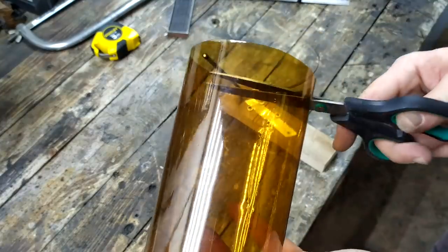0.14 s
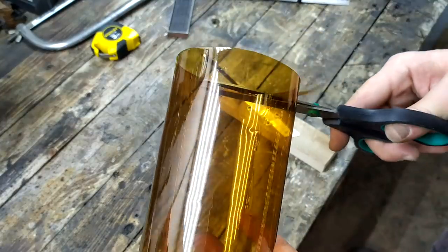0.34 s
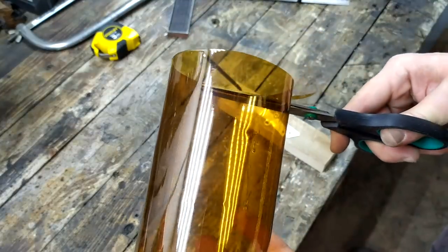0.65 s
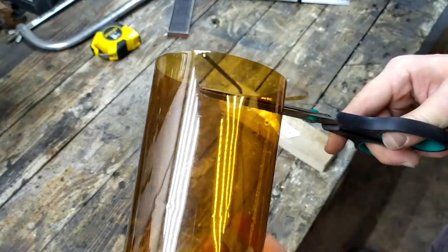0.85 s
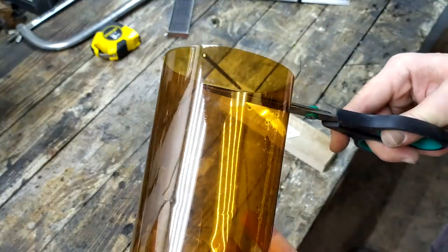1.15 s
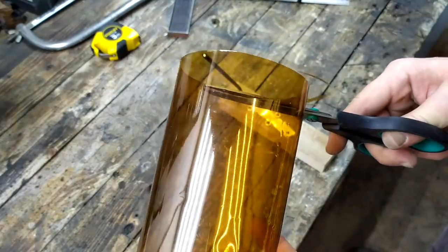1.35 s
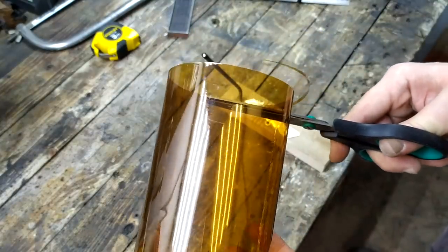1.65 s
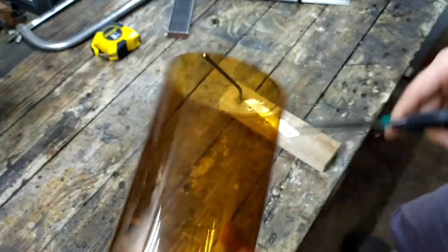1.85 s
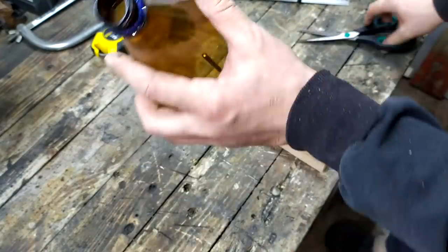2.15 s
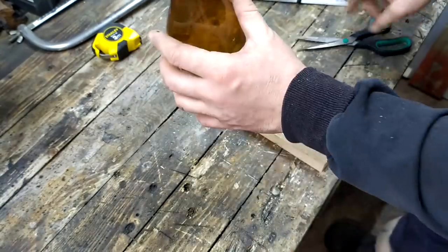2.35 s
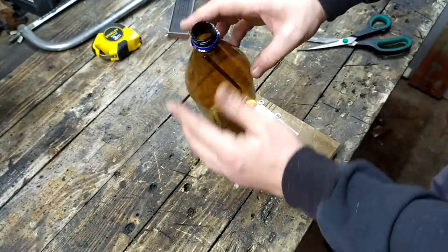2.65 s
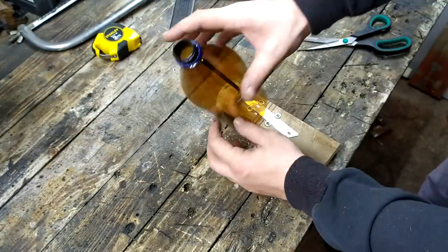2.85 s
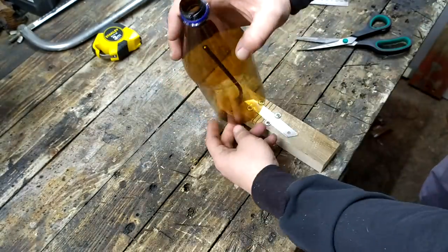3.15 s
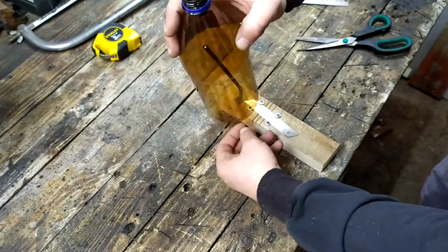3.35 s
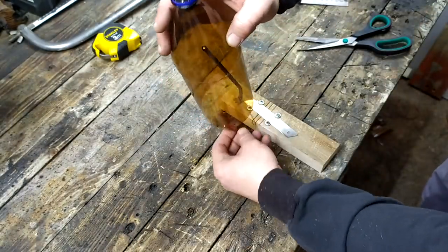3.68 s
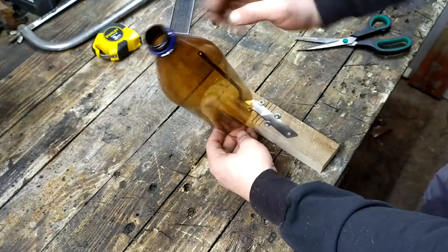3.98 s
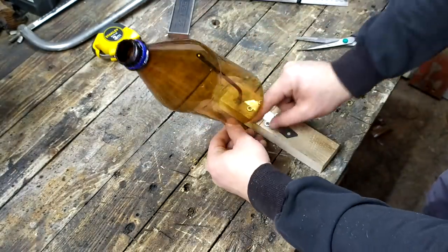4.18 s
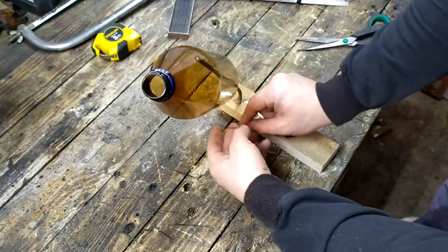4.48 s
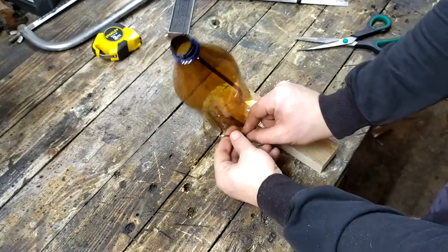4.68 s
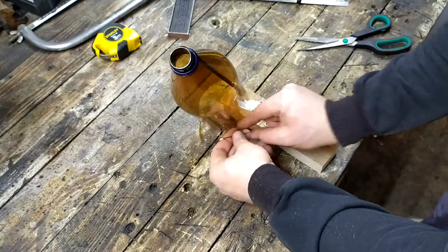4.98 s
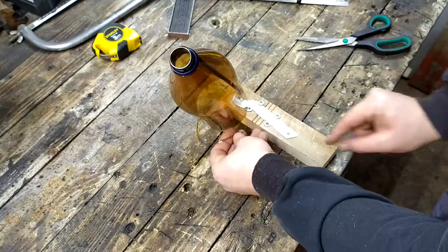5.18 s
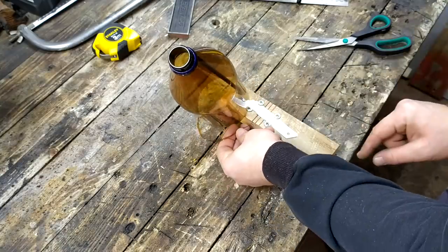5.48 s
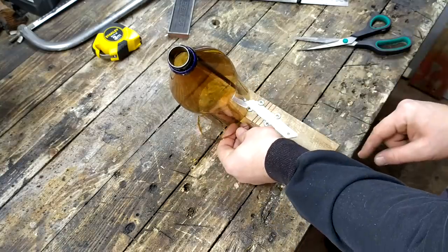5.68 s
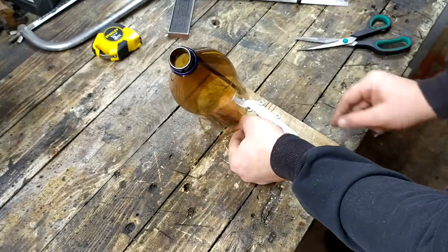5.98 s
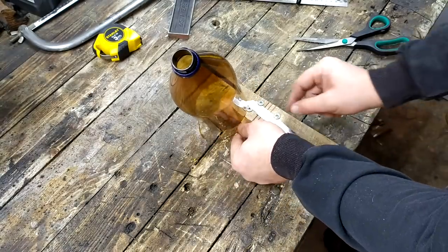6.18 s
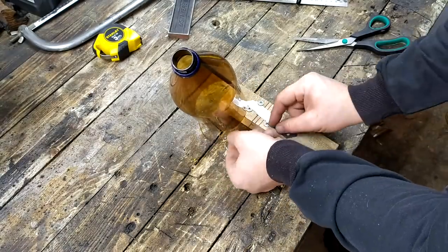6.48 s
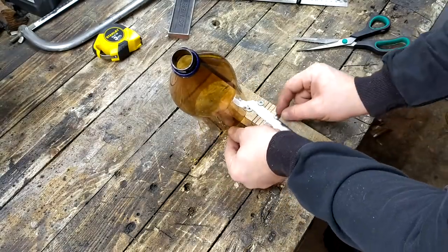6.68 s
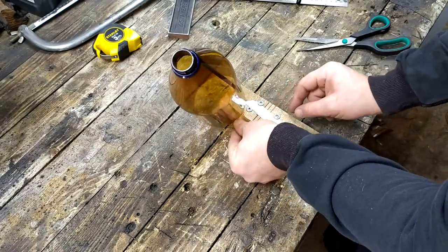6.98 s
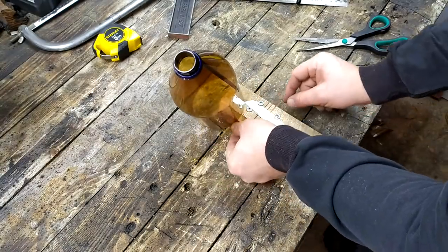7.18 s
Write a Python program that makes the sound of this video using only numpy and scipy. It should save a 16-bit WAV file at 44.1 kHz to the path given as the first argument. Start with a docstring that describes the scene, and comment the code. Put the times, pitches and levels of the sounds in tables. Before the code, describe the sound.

Close-up plastic cutting with crisp snaps, scissors dropped on wood, then squeaky rubbing and hollow knocks from a bottle in a quietly humming workshop.

```python
"""Over a low hum and hiss, a thin plastic bottle rasps and snaps as scissors cut it.
The scissors then clatter onto a wooden bench, and the bottle is turned over and fitted onto a rod and blade.
Snaps are noise bursts with damped tones, many near 700 Hz; strokes are random tiny slips driving the same tones.
Thumps and scissors ring wood and steel tones, and a small, quiet workshop adds a short noise tail."""
import sys
import numpy as np
from scipy import signal
from scipy.fft import rfft, irfft, next_fast_len
from scipy.io import wavfile
from scipy.ndimage import uniform_filter1d, map_coordinates

SR = 44100
rng = np.random.default_rng(int(sys.argv[2]) if len(sys.argv) > 2 else 0)


def unload_wav(signal):
    """Save mono or channel-first audio to the path in sys.argv[1] as 16-bit WAV at rate SR, clipped to [-1, 1]."""
    wavfile.write(
        sys.argv[1],
        SR,
        np.round(np.clip(np.atleast_2d(signal).T, -1, 1) * 32767).astype(np.int16),
    )


N = 323253  # length in samples


def amp(db):
    """Turns decibels into a gain."""
    return 10 ** (np.asarray(db) / 20)


def unit(x):
    """Scales a sound to an average (rms) strength of 1."""
    return x / np.sqrt(np.mean(x ** 2) + 1e-20)


def along(points, hz):
    """Reads a curve of (f/Hz, value) points, spaced by pitch (log frequency)."""
    f, value = np.transpose(points)
    return np.interp(np.log(hz + 1), np.log(f + 1), value)


def filtered(x, response):
    """Multiplies each frequency of a sound by a gain."""
    size = next_fast_len(len(x) + 8192)
    hz = np.fft.rfftfreq(size, 1 / SR)
    return irfft(rfft(x, size) * response(hz), size)[:len(x)]


def shaped(x, spectrum):
    """Colours a sound with a curve of (f/Hz, level/dB) points."""
    return filtered(x, lambda hz: amp(along(spectrum, hz)))


def wobble(rate):
    """Draws a smooth random curve through `rate` random points a second."""
    points = rng.standard_normal(int(N * rate / SR) + 4)
    return map_coordinates(points, [np.arange(N) * rate / SR])


AFTER = np.arange(SR // 6) / SR  # t/s after a blow; each ring or burst lasts a sixth of a second


def ring(modes, attack, scatter_db):
    """A blow makes damped tones swell in together; all but the first get a random strength."""
    hz, db, t60 = np.transpose(modes)[:, :, None]
    scatter = scatter_db * rng.standard_normal(db.shape) * (hz != hz[0])
    swell = (1 - np.exp(-AFTER / attack)) ** 2
    swing = np.sin(2 * np.pi * hz * (AFTER - 1.5 * attack))  # the tones are in step as the blow ends
    fading = amp(db + scatter - 60 * AFTER / t60)
    return swell * np.sum(fading * swing, axis=0)


def burst(t60):
    """White noise rises within a few milliseconds and fades by 60 dB in t60 seconds."""
    rise = 1 - np.exp(-AFTER / 0.0013)
    return rng.standard_normal(len(AFTER)) * amp(-60 * AFTER / t60) * rise


def add(track, s, sound):
    """Mixes a sound in at s seconds."""
    track[round(s * SR):][:len(sound)] += sound


# colour of the workshop's hum and hiss: [f/Hz, relative level/dB per Hz]
SHOP = [(13, -72.5), (22, -44.5), (43, -23), (62, -7), (146, -6.5), (202, -13.5), (550, -21.5), (721, -11),
        (895, -21.5), (2570, -29.5), (12300, -33), (14100, -38.5)]


def shop():
    """Low hum and hiss are coloured noise whose level wavers a little."""
    waver_db = .7 * wobble(5)
    hum_and_hiss = unit(shaped(rng.standard_normal(N), SHOP))
    return amp(-71 + waver_db) * hum_and_hiss


def crinkled(x, patchy_db):
    """Each bend of the wall has its own colour: random patches of gain over time and pitch."""
    z = signal.stft(x, nperseg=256)[2]
    across_pitch = uniform_filter1d(rng.standard_normal(z.shape), size=3, axis=0)
    patches = uniform_filter1d(across_pitch, size=12, axis=1)
    return signal.istft(z * amp(patchy_db * unit(patches)), nperseg=256)[1][:len(x)]


# colour of the blades going through the wall: [f/Hz, relative level/dB per Hz]
RASP = [(590, -41.5), (1000, -17.5), (2480, -4), (3270, -8.5), (4720, -8), (12400, -17), (14100, -32.5)]
# colour of the rim on rod and wood: [f/Hz, relative level/dB per Hz]
SCUFF = [(590, -39.5), (1000, -19), (1630, -10.5), (2510, -5), (3350, -9.5), (4080, -2.5), (12100, -9.5),
         (14100, -18)]
CUT_ENDS = 1.75  # s


def plastic(x):
    """The wall rasps under the blades first and scuffs on the rod later."""
    cutting = np.arange(len(x)) < CUT_ENDS * SR
    return shaped(x * cutting, RASP) + amp(-3.5) * shaped(x * ~cutting, SCUFF)


# colour of the soft wall flapping: [f/Hz, relative level/dB per Hz]
FLAP = [(80, -27.5), (180, -8), (330, -3.5), (520, -9.5), (1200, -13.5), (2000, -31.5)]


def flapping(x):
    """The soft wall flaps with a dull sound, made by colouring the noise that pushes it."""
    return shaped(x, FLAP)


# strokes of blade, rod and fingers along the wall: [t/s, length/s, rasp level/dB]
STROKES = [(0.0, .057, -54.5), (0.122, 0.039, -52), (0.192, 0.089, -58), (0.31, 0.036, -55),
           (0.471, 0.056, -68), (0.557, 0.081, -67), (0.689, 0.14, -58), (0.93, .057, -54.5),
           (1.031, 0.046, -72.5), (1.112, 0.097, -56.5), (1.319, 0.086, -56.5), (1.42, 0.05, -70),
           (1.518, 0.059, -65), (1.6, 0.1, -61.5), (1.772, 0.12, -59.5), (1.905, 0.15, -64.5),
           (2.07, .09, -72.5), (2.176, .31, -71), (2.502, 0.14, -66.5), (2.661, 0.039, -57),
           (2.797, 0.057, -55), (2.878, 0.047, -53), (2.947, 0.056, -64.5), (3.034, 0.081, -66),
           (3.119, 0.19, -57.5), (3.328, 0.09, -62), (3.433, 0.13, -71.5), (3.577, 0.09, -60.5),
           (3.805, 0.055, -71), (3.867, 0.041, -58), (3.94, 0.25, -63.5), (4.104, 0.066, -58.5),
           (4.18, 0.069, -58), (4.266, 0.11, -64.5), (4.358, 0.0404, -57.5), (4.503, 0.049, -75),
           (4.564, 0.11, -68.5), (4.725, 0.089, -61), (4.885, 0.039, -67), (5.015, 0.14, -73),
           (5.775, 0.0606, -85), (5.83, 0.036, -74.5), (5.884, 0.064, -81), (5.967, 0.063, -72),
           (6.149, 0.033, -72.5), (6.394, 0.081, -77.5), (6.566, 0.065, -79), (6.693, 0.24, -83),
           (6.869, 0.049, -66.5), (6.958, 0.046, -69.5), (7.044, 0.079, -75.5), (7.144, 0.09, -76),
           (7.257, 0.052, -71)]
# how the bottle is held: the hollow sings lower once the open end is turned down, louder once let go
# [t/s, share of the low ring 0-1, hollow over rasp level/dB, wall ring over hollow level/dB]
TURN = [(0, 0.22, 8.5, -41), (.6, .15, 10.5, -18), (.9, 0.22, 3, -20), (1.4, 0.11, 4, -24),
        (2, 0.06, 0.5, -35.5), (2.6, .39, 8, -9), (3.3, 0.2, 1.5, -20), (3.9, 0.18, 4, -8.5),
        (4.4, 0.31, 3, -15), (4.999, .45, 12.5, -17), (6.698, 0.3, 11, -17.5), (6.9, 0.81, 23, -18)]
# tones of the bottle, also rung by the snaps: [f/Hz, relative level/dB, time to fade by 60 dB t60/s]
LOW_RING = [(649.8, 2, 0.1), (619.6, -28, 0.025), (530, -7, 0.011)]
HIGH_RING = [(725.7, 7, 0.064), (714, -9.5, 0.013), (834, -22, 0.077), (956, -21, 0.095), (1130, -22, 0.03),
             (1320, -25, 0.097)]
WALL = [(2443, -12.5, 0.044), (2503, 1.5, 0.012), (1950, -11.5, 0.045)]


def rubbing():
    """Tiny slips in clumps rasp along the wall and keep the bottle's tones sounding."""
    rasp = np.zeros(N)
    for s, length, db in STROKES:
        rasp[round(s * SR):round((s + length) * SR)] = amp(db)
    rasp = uniform_filter1d(rasp, size=260)  # softens the stroke edges

    when, *held = np.transpose(TURN)
    share, over_db, wall_db = [np.interp(np.arange(N) / SR, when, column) for column in held]
    low = np.clip(share, 0, 1)
    hollow = rasp * amp(over_db)

    chance, size, sign = rng.random((3, N))
    slip_sizes = amp(-2.2 * np.log(size + 0.0012))  # a few slips are much stronger
    slips = (chance < 900 / SR) * slip_sizes * np.sign(sign - .5)  # about 900 slips a second
    slips_and_noise = unit(unit(slips) + 0.6 * rng.standard_normal(N))
    drive = unit(slips_and_noise * amp(2.5 * wobble(70)))  # the wobble gathers it into clumps

    out = rasp * unit(plastic(crinkled(drive, patchy_db=3.5)))
    out += flapping(hollow * amp(0.5) * drive)
    driven = [(hollow * low, LOW_RING), (hollow * (1 - low), HIGH_RING), (hollow * amp(wall_db), WALL[:2])]
    for force, modes in driven:
        answer = ring(modes, attack=.001, scatter_db=0)
        answer = answer / np.linalg.norm(answer)
        out += signal.fftconvolve(force * drive, answer)[:N]
    return out


# how long the workshop's echo takes to fade by 60 dB: [f/Hz, t60/s]
ROOM = [(150, 0.3), (700, 0.13), (3000, 0.15), (12000, 0.11)]


def room(x, parts=18):
    """The shop answers with noise fading band by band, drawn afresh in equal steps of time."""
    out = np.zeros(N + SR)
    step = N // parts + 1
    for k in range(parts):
        hz, t, z = signal.stft(rng.standard_normal(SR // 3), SR, nperseg=256)
        fading = amp(-60 * t / along(ROOM, hz)[:, None])
        tail = signal.istft(z * fading, SR, nperseg=256)[1]
        tail = tail / np.linalg.norm(tail)
        add(out, k * step / SR + .004, signal.fftconvolve(x[k * step:][:step], tail))  # 4 ms late
    return out[:N]


# snaps and knocks of the wall, before colouring: [t/s, crack level/dB, hollow level/dB, low-ring share 0-1]
SNAPS = [(0.0293, -27.5, -52.5, .15), (0.0712, -28.5, -20, .1), (0.1256, -43, -30, 0.5),
         (0.1434, -38.5, -25.5, .02), (0.2324, -45, -48, 0.6), (0.2424, -36, -30.5, .2),
         (0.3157, -17, -17.5, .25), (0.3656, -15, -15, .02), (0.4594, -39, -40, .2),
         (0.6978, -30, -42.5, .7), (0.7113, -32.5, -41.5, .7), (0.7816, -29.5, -52, .9),
         (0.9338, -35, -51, .7), (1.1169, -26, -35.5, .65), (1.1484, -43, -36.5, .8),
         (1.1932, -39.5, -41, .15), (1.3229, -39, -55, .02), (1.3872, -38, -60, 0.1),
         (1.4316, -43.5, -46, .02), (1.5534, -41.5, -45.5, .2), (1.6182, -38.5, -40.5, .02),
         (1.6397, -21, -29.5, .1), (1.8048, -30, -38.5, .02), (1.8662, -30.5, -39, .02),
         (1.9155, -30.5, -73, .5), (2.5414, -37.5, -37.5, .4), (2.603, -41, -45, .02),
         (2.6978, -14, -18, .85), (2.815, -21.5, -28.5, .9), (2.9004, -44.5, -34, .9),
         (2.9692, -38, -43, 0.3), (2.9804, -48, -37.5, .9), (3.046, -41, -59, 0.4),
         (3.1188, -30.5, -41.5, .95), (3.1487, -38, -58, 0.7), (3.1717, -26, -70, .5),
         (3.208, -45, -43, 0.35), (3.242, -34.5, -46.5, .05), (3.6157, -30.5, -49, .9),
         (3.6626, -28.5, -59, .5), (3.7404, -28, -47.5, .25), (3.7808, -41, -55, 0.3),
         (3.8904, -35.5, -35, .65), (3.9933, -29, -67, .1), (4.0984, -54, -43.5, .1),
         (4.138, -48, -49, 0.2), (4.19, -36, -55, 0.4), (4.235, -33.5, -46, 0.5),
         (4.363, -40.5, -49.5, .25), (4.571, -44, -40.5, .07), (4.6897, -29, -8, .47),
         (4.7371, -34, -21.5, .05), (4.7461, -29, -16, .6), (4.7785, -29, -31.5, .02),
         (5.0609, -44.5, -45, .1), (5.0938, -36, -43.5, .9), (5.1064, -50, -34, .95), (5.8426, -51, -58, 0),
         (5.9874, -50, -41, .9), (6.0227, -36, -49.5, 0.53), (6.1429, -48.5, -76, .3),
         (6.2064, -56.5, -46, .95), (6.4064, -70.5, -45.5, .95), (6.5814, -53, -47.5, .95),
         (6.8724, -62, -37.5, .75), (6.9042, -43.5, -43, .25), (6.961, -56, -56, 0.4),
         (7.003, -56, -40.5, 0.75), (7.0618, -56, -42, .05), (7.1591, -37.5, -40, .55),
         (7.1744, -49, -39.5, .75), (7.212, -48.5, -55, 0.7), (7.2769, -38, -38.5, .9),
         (7.303, -55, -46, .6)]
# a snap's wall ring follows both its crack and its hollow, 9 dB below their weighted middle
WALL_FROM_CRACK, WALL_DB = 0.54, -9
# its thud grows slower than the hollow
THUD_GROWS, THUD_DB = 0.7, -4


def snaps():
    """Each snap cracks, rings the wall and the hollow, and flaps the soft wall."""
    cracks, rings, thuds = np.zeros((3, N + SR))
    push = .0025  # s, swell time of the hollow
    for s, crack_db, hollow_db, share in SNAPS:
        low = np.clip(share, 0, 1)
        low_ring = np.sqrt(low) * ring(LOW_RING, push, scatter_db=1.5)
        high_ring = np.sqrt(1 - low) * ring(HIGH_RING, push, scatter_db=3)
        wall_db = WALL_DB + hollow_db + WALL_FROM_CRACK * (crack_db - hollow_db)
        wall_ring = amp(wall_db) * ring(WALL, attack=.0004, scatter_db=6)
        add(cracks, s, amp(crack_db) * burst(t60=0.037))
        add(rings, s, amp(hollow_db) * (low_ring + high_ring) + wall_ring)
        add(thuds, s, amp(THUD_DB + THUD_GROWS * hollow_db) * burst(t60=0.082))
    crackle = amp(2.0) * plastic(crinkled(cracks, patchy_db=4.5))
    return (crackle + rings + flapping(thuds))[:N]


# low thumps of the planks, first under the landing scissors, later under hands and bottle:
# [t/s, level/dB, extra level of the deepest tone/dB]
THUMPS = [(1.986, -36, 1), (2.008, -31, 4.5), (2.173, -31.5, -16), (2.286, -44.5, -4), (2.332, -35, -4),
          (2.414, -27, -4), (2.458, -38, -1.5), (2.546, -43.5, -1), (2.842, -45, -2.5), (2.99, -44.5, -2),
          (3.89, -44.5, -6.5), (4.583, -47.5, -5), (4.69, -35, -5.5), (4.75, -43.5, -2.5),
          (5.107, -39, -16), (6.881, -41, -27), (6.9, -42, -6), (7.001, -59, -8)]
# tones of the bench planks: [f/Hz, relative level/dB, t60/s]
BENCH = [(105, 0, 0.065), (155, 0, 0.07), (257.5, -5, 0.045), (330, -9, .04), (421.6, -9, 0.045)]


def bench_thumps():
    """Soft blows make the planks thump in damped low tones."""
    thumps = np.zeros(N + SR)
    soft = .006  # s, slow swell of a soft blow
    for s, db, deep_db in THUMPS:
        deepest = amp(deep_db) * ring(BENCH[:1], soft, scatter_db=0)
        others = ring(BENCH[1:], soft, scatter_db=4.5)
        add(thumps, s, amp(db) * (deepest + others))
    return thumps[:N]


# scissors landing on the bench, before colouring: [t/s, steel clack level/dB, grip knock level/dB]
BENCH_HITS = [(2.0137, -51, -51), (2.1721, -46.5, -45.5), (2.2369, -22, -46.5), (2.3102, -21, -43),
              (2.3475, -41, -41), (2.3782, -43, -36.5), (2.4103, -32, -37), (2.4255, -49, -33)]
# colour of steel on wood: [f/Hz, relative level/dB per Hz]
CLACK = [(760, -10), (1300, -12.5), (2610, -5), (3030, -8), (11900, -38.5), (14000, -48)]
# colour of plastic grips on wood: [f/Hz, relative level/dB per Hz]
KNOCK = [(300, -22.5), (550, -3), (950, -3.5), (1500, -7), (3000, -33.5)]
# tones of the scissors: [f/Hz, relative level/dB, t60/s]
SCISSORS = [(2100, -5.5, 0.035), (1900, -8, 0.042), (1500, -12.5, 0.019), (2310, -11, 0.022),
            (2710, -12, 0.027), (3120, -18, 0.012)]
RATTLE_T60 = 0.083  # s


def scissors_landing():
    """Blades clack and ring and grips knock; short noise bursts let both rattle on briefly."""
    clacks, knocks, rings = np.zeros((3, N + SR))
    for s, clack_db, knock_db in BENCH_HITS:
        add(clacks, s, amp(clack_db) * burst(RATTLE_T60))
        add(knocks, s, amp(knock_db) * burst(RATTLE_T60))
        add(rings, s, amp(clack_db - 8) * ring(SCISSORS, attack=0.00041, scatter_db=5))
    return (amp(3.5) * shaped(clacks, CLACK) + amp(13.0) * shaped(knocks, KNOCK) + rings)[:N]


def scene():
    """Bottle and bench sound close by, in the shop; things this small send out no deep bass."""
    handling = rubbing() + snaps() + bench_thumps() + scissors_landing()
    near = shaped(handling, [(25, -33.5), (50, -14.5), (95, 0.0)])
    wet = shaped(near, [(700, -6.5), (2000, -7.0)])  # what the room sends back
    return (near + room(wet) + shop())[None]


TOP_HZ = 14282


def record(dry):
    """The microphone fades towards its band limit and keeps nothing above."""
    fade = [(13000, 0), (14200, -5.5)]  # f/Hz, level/dB
    return filtered(dry[0], lambda hz: amp(along(fade, hz)) * (hz < TOP_HZ))[None]


dry = scene()
out = record(dry)
unload_wav(out)
```